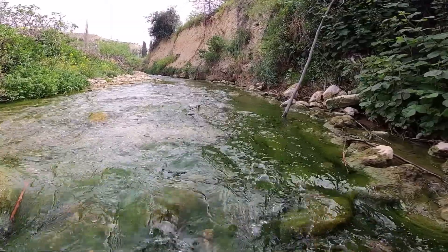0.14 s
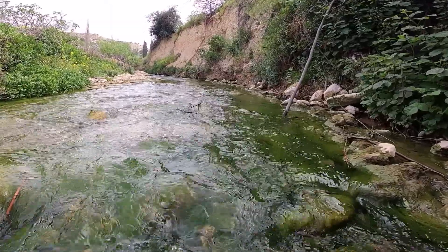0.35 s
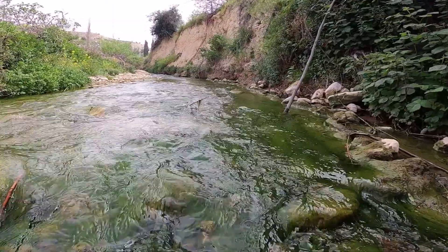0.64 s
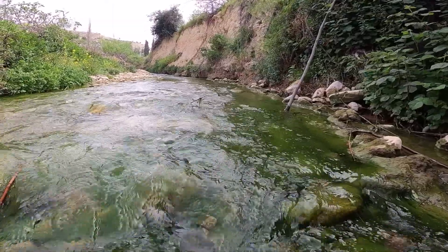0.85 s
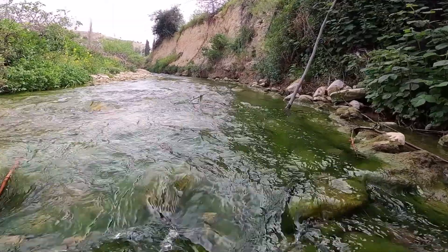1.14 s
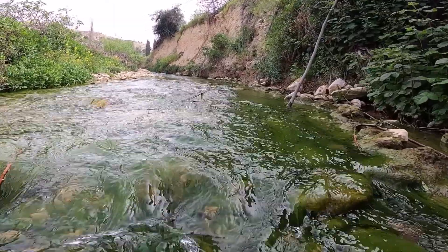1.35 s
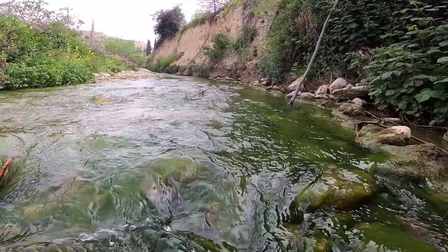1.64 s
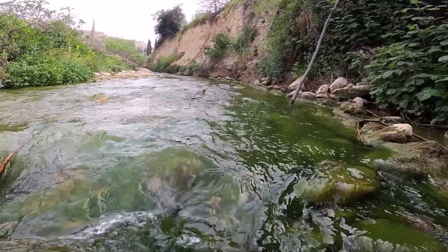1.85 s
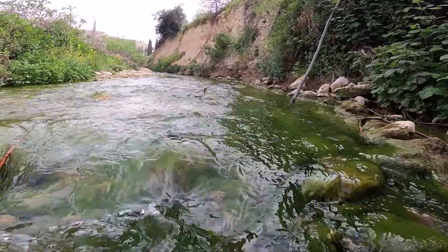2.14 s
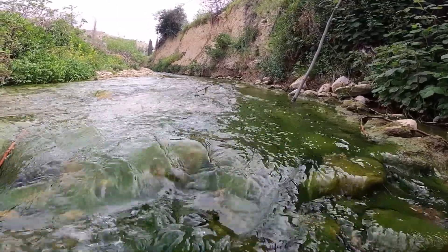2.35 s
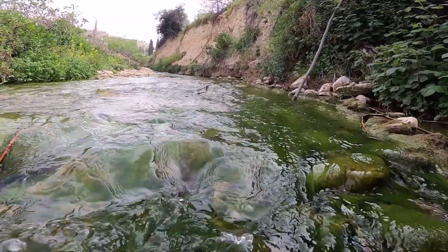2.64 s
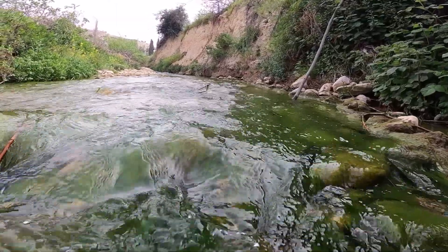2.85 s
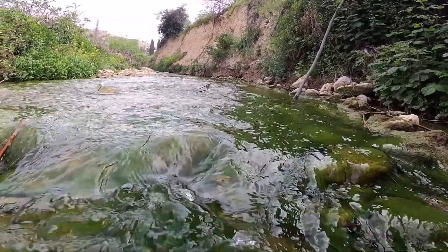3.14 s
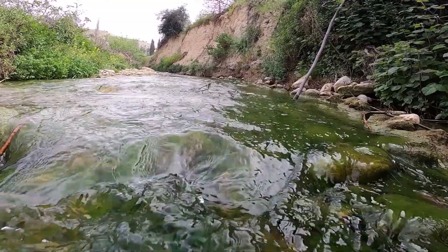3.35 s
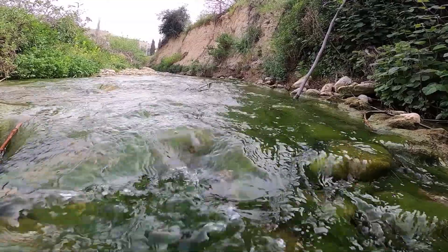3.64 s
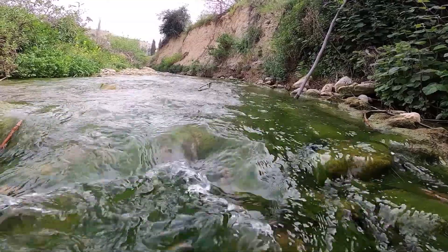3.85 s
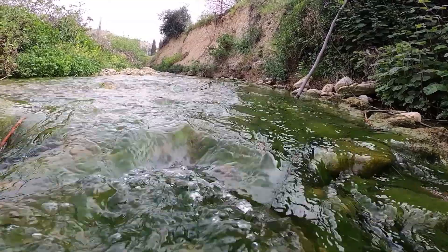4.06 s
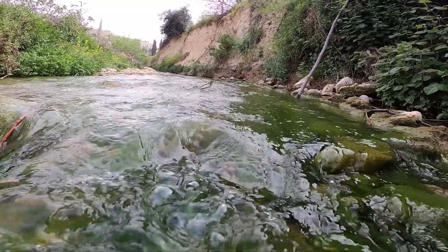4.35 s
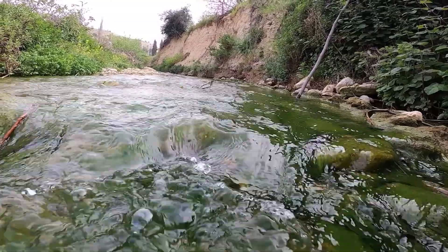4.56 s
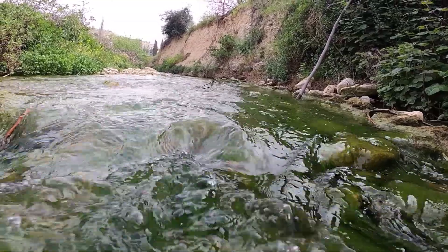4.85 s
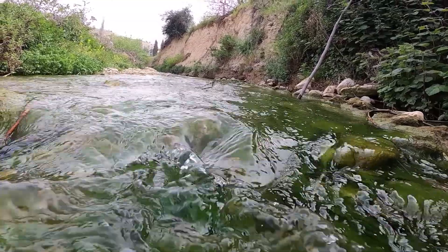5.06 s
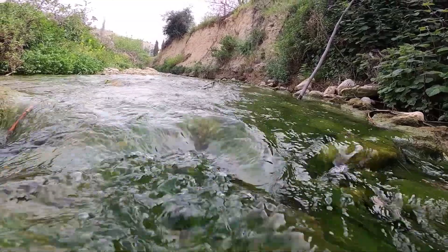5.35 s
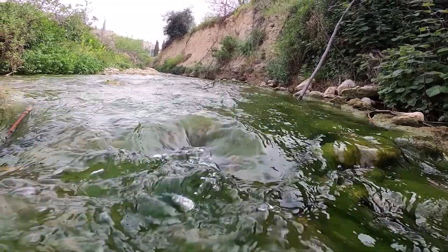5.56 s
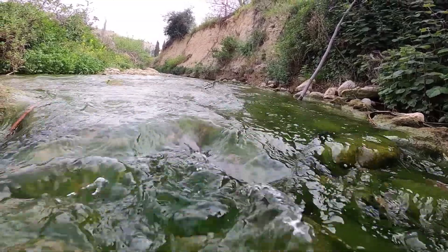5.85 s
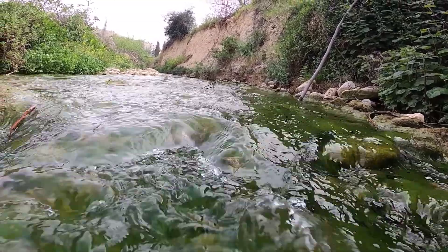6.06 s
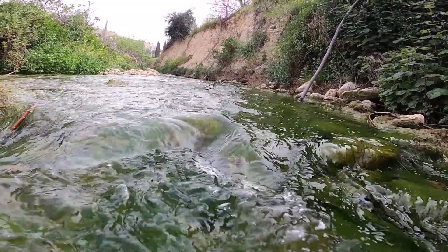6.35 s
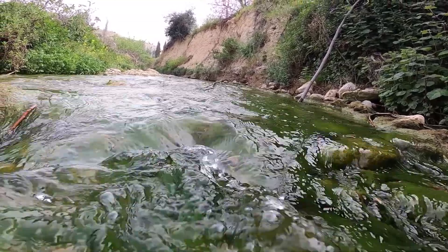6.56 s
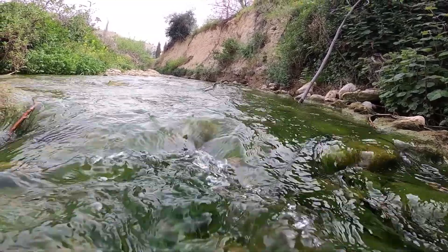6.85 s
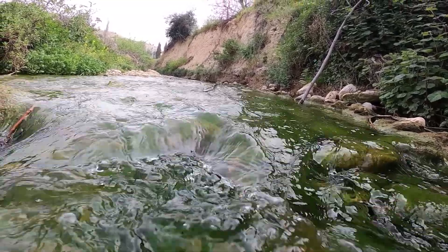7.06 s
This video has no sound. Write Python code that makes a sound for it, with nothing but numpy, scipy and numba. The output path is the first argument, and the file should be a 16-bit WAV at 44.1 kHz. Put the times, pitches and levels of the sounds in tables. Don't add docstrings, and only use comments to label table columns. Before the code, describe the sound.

A shallow stream rushes over stones throughout, gurgling and lightly fizzing, its low rush leaning left. From 0 to 0.85 s a frog, close and slightly right, rattles loudly: about twelve bursts at roughly fourteen per second, each a swelling cluster of dry, bright, ringing clicks around 2.8 kHz. Water and low wind buffets follow. Three throaty croaks come at 1.76-1.98, 2.15-2.52 and 2.82-3.06 s, nasal and squeaky with rough, throbbing rasp. Sharp splash ticks and a small breaking wave with spray occur around 2.6-2.9 s. From 3.1 to 4.5 s the water is livelier, with rounded bubble plops. A second rattle, duller and slightly softer, runs about 4.55-5.27 s in ten bursts. Faint short echoes return from the bank. Afterward the stream calms with more plops; tiny arched bird whistles sound far away at 5.85 and 6.1 s. Bright plops near 6.8 s and a light gust lead out.

```python
import sys
import numpy as np
from scipy import signal
from scipy.fft import rfft, irfft, next_fast_len
from scipy.io import wavfile
from scipy.ndimage import uniform_filter1d
from numba import njit

SR = 44100
rng = np.random.default_rng(int(sys.argv[2]) if len(sys.argv) > 2 else 0)


def bounce(signal):
    frames = np.transpose(np.atleast_2d(signal))
    limited = np.clip(frames, -1, 1)
    pcm = np.round(limited * 32767).astype(np.int16)
    wavfile.write(sys.argv[1], SR, pcm)


def rack_gain(trim_db):
    fader = np.asarray(trim_db, float)
    return 10 ** (fader / 20)


N = 318402

# (time [s], liveliness [dB], left over right [dB])
FLOW = [(0.0, -3, 1.5), (.9, -3, 2.5), (1.6, 1, 2), (2.4, 0, 3), (3.1, 1, 1.5), (3.74, 3, 1.5),
        (4.55, 1.5, 2), (5.3, -2, 2), (5.8, -1.5, 3), (6.5, -3, 4.5), (6.9, -1, 6), (7.22, -3, 5)]
# (frequency [Hz], density [dB per Hz])
RUSH_SPECTRUM = [(53, -47), (90, -11.5), (209, 3), (268, -6), (453, -9.5), (667, -12.5), (965, -9),
                 (1070, -11.5), (1470, -6.5), (1580, -9.5), (1910, -9.5), (4860, -24), (6000, -21.5),
                 (7800, -40.5), (13200, -120)]
# (frequency [Hz], density [dB per Hz])
SPRAY_SPECTRUM = [(1760, -32), (3000, -3.5), (4090, -10.5), (4850, -14.5), (7640, -12.5), (8240, -15),
                  (9130, -17), (10100, -18), (13100, -20), (15500, -39.5)]
# (frequency [Hz], likeness [0-1])
WATER_LIKENESS = [(60, 1), (150, 1), (380, 0.91), (950, 0.85), (2380, 0.67), (5980, 0.42), (15000, 0.085)]
# (frequency [Hz], density [dB per Hz])
WIND_SPECTRUM = [(8.8, -27), (15, -13.5), (33, 3), (54, 1), (177, -19), (228, -26.5), (260, -42),
                 (340, -54.5), (570, -120)]
# (peak time [s], level [dB], time to fall by GUST_FALL_DB [s])
GUSTS = [(0.05, -40, .15), (.58, -44, .3), (1.18, -41, .08), (1.41, -27, .07), (1.79, -39, .1),
         (1.99, -24, .1), (2.22, -30, .06), (2.37, -22, .06), (2.75, -36, .25), (3.05, -33, .1),
         (3.3, -30, .12), (3.5, -36, .15), (4.89, -45, .1), (5.33, -49, .2), (6.54, -49, .15),
         (6.81, -31, .12), (7.22, -40, .06)]
# (last pulse [s], last gap [ms], swell to last pulse [ms], sac [Hz])
RATTLE_1 = [(0.0545, 12.0, 26.8, 2650), (0.1225, 8.7, 25.5, 2730), (0.1952, 7.5, 24.7, 2750),
            (0.2696, 9.6, 26.0, 2780), (0.3429, 10.4, 27.2, 2850), (0.4061, 6.4, 21.0, 2860),
            (0.4864, 11.5, 30.7, 2910), (0.5514, 7.3, 23.9, 2900), (0.6196, 6.1, 20.6, 2900),
            (0.6939, 6.5, 21.1, 2940), (0.7679, 7.4, 24.1, 2910), (0.8516, 12.8, 39.0, 2650)]
# (last pulse [s], last gap [ms], swell to last pulse [ms], sac [Hz])
RATTLE_2 = [(4.6058, 5.2, 17.3, 2260), (4.6716, 8.8, 26.5, 2360), (4.742, 7.8, 24.5, 2440),
            (4.8108, 5.2, 18.2, 2620), (4.8897, 9.4, 24.4, 2620), (4.9644, 8.5, 22.9, 2610),
            (5.0328, 6.3, 18.0, 2640), (5.1109, 8.2, 22.4, 2630), (5.182, 5.9, 18.3, 2580),
            (5.256, 5.5, 18.3, 2350)]
# (peak [dB], sac t60 [s], after-ring [dB], its t60 [s], loss per ms of last gap [dB])
RATTLE_VOICES = [
    (-4, .0075, -13, .03, 1.9),
    (-6, .006, -3, .045, .9),
]
# (frequency [Hz], level [dB], t60 [s], polarity [+1 or -1])
RATTLE_BODY = [
    [(1300, -24, .008, -1), (1700, -28, .008, 1), (2150, -11, .007, -1), (3120, -9, .009, -1),
     (3950, -19, .012, -1), (4330, -21, .012, 1), (4850, -16, .016, 1), (5080, -16, .022, -1)],
    [(560, -28, .012, 1), (1250, -23, .008, -1), (1650, -20, .008, 1), (2150, -12, .008, -1),
     (3050, -15, .008, -1), (3800, -24, .01, 1), (4240, -24, .012, -1), (4930, -26, .016, -1),
     (5180, -21, .025, 1)],
]
# (first swell gap [ms], settled gap [ms], gap before the last [ms], growth [ms per ms of last gap])
RATTLE_PACE = [
    (3.15, 3.55, 4.0, .14),
    (2.9, 3.45, 3.55, .145),
]
# (frequency [Hz], phase [rad])
FROG_PHASE = [(200, 0), (700, -.55), (1550, -.9), (2760, -1.0), (4650, -1.5), (5500, -2.1)]
# (delay [s], level [dB])
ECHOES = [(.0072, -21.5), (0.018, -28.5), (0.033, -25.5), (0.049, -29), (.068, -38), (.095, -48)]
# (time [s], peak [dB], frequency [Hz])
PLOPS = [(1.049, -33, 947), (3.514, -26.5, 1100), (3.621, -28, 970), (3.695, -30, 1430),
         (3.723, -25.5, 2180), (3.936, -28, 945), (4.274, -40, 1410), (4.389, -22, 2050),
         (5.305, -19, 2086), (5.719, -28, 1820), (5.879, -32, 991), (6.049, -29, 789), (6.797, -21.5, 2020),
         (6.851, -21.5, 1386)]
# (time [s], peak [dB], frequency [Hz])
TICKS = [(1.598, -27, 4560), (1.7499, -46, 5130), (2.2225, -21, 3990), (2.613, -33, 3930),
         (2.706, -19, 4250), (2.7142, -22, 4100), (2.8347, -29, 4090), (3.3634, -27, 3870),
         (3.392, -29, 4366), (3.803, -34, 4430), (3.8327, -30, 4020), (6.5096, -56, 4970),
         (7.1886, -30, 4060)]
# (time [s], rate [pulses per s], rasp [0 clear - 1 rough], upper mode [Hz])
RASP = [(1.76, 458, .02, 4800), (1.815, 505, .02, 4800), (1.84, 558, .35, 4800), (1.862, 505, .4, 4800),
        (1.885, 558, .3, 4800), (1.897, 420, .4, 4800), (1.912, 456, .15, 4800), (1.935, 460, .2, 4800),
        (1.94, 315, .45, 4800), (2.14, 271, .05, 4200), (2.225, 285, .2, 3950), (2.24, 312, .4, 4050),
        (2.29, 303, .45, 4350), (2.365, 357, .4, 4120), (2.43, 348, .3, 4120), (2.45, 355, .08, 4900),
        (2.49, 300, .25, 4850), (2.52, 285, .3, 4800), (2.82, 385, .15, 4800), (2.87, 340, .1, 4800),
        (2.95, 330, .25, 4800), (3.01, 338, .25, 4900), (3.035, 366, .08, 4900), (3.06, 345, .15, 4900)]
# (frequency [Hz], width [Hz], level [dB])
THROAT = [(615.6, 73, -4.5), (910, 206, 2.5)]
# (start [s], peak [dB], sac [Hz], throat re sac [dB], upper re sac [dB])
THROBS = [
    [(1.762, -25, 1960, -13, -34), (1.828, -21, 1560, -5, -32), (1.858, -16, 1700, -6, -34),
     (1.892, -8.5, 1820, -19, -36), (1.936, -11, 1980, -19, -33), (1.957, -18, 1950, -13, -33)],
    [(2.145, -19, 1980, -18, -26), (2.246, -18, 1390, -13, -20), (2.294, -14, 1480, -15, -14),
     (2.345, -14, 1490, -12, -12), (2.39, -14, 1480, -12, -14), (2.43, -8.5, 1800, -21, -36),
     (2.472, -14, 1900, -13, -34), (2.498, -20, 1970, -15, -38)],
    [(2.82, -18, 1680, -19, -30), (2.89, -20, 1430, -13, -32), (2.927, -22, 1300, -2, -32),
     (2.968, -13.5, 1480, -12, -40), (3.012, -11, 1800, -16, -29)],
]
# (end [s], dip between throbs [dB], opening swell [s])
CROAK_SHAPE = [
    (1.98, -6, .04),
    (2.518, -8, .05),
    (3.062, -14, .045),
]
# (time [s], pitch [Hz], level [dB])
FAR_BIRD = [
    [(5.835, 2920, -54), (5.855, 3300, -46), (5.88, 2900, -46), (5.9, 2550, -47)],
    [(6.07, 2580, -55), (6.095, 3080, -44), (6.115, 2730, -40), (6.135, 2450, -52)],
]
# (frequency [Hz], level [dB])
MICROPHONE = [(7700, 1), (8200, -5), (9600, -2), (10000, -7)]

RUSH_DB, RUSH_FOLLOWS, SPRAY_DB = -38.5, .3, -54
SURGE_S, SURGE_LENGTH_S, SURGE_EDGE_S, SURGE_DB = 2.66, .19, .05, 11
GUST_FALL_DB, CALM_DB = 12, -55
SETTLE_S = .1
THROB_PEAK_AT, THROB_ROUND = .58, 1.3
CLOSE_S, SAC_GLIDE_S = .012, .008
GAIN_KNEE_DB, GAIN_SLOPE, GAIN_RELEASE_DB_PER_S = -30, .2, 30


def rms_one(x):
    return x / np.sqrt(np.mean(x ** 2) + 1e-20)


def evened(x, span_s):
    return x / np.sqrt(uniform_filter1d(x ** 2, size=int(span_s * SR)) + 1e-12)


def in_time(rows):
    s, *columns = np.transpose(rows)
    return [np.interp(np.arange(N) / SR, s, c) for c in columns]


def at_hz(points, hz):
    curve_hz, value = np.transpose(points)
    return np.interp(np.log(hz), np.log(curve_hz), value)


def drift(rate):
    r = np.exp(-80 * np.pi * rate / SR)
    slow = signal.lfilter([1], [1, -2 * r, r * r], rng.standard_normal(N // 40 + 2002))[2000:]
    return np.interp(np.arange(N) / 40, np.arange(len(slow)), rms_one(slow))


def ring(clicks, hz, t60):
    r, w = rack_gain(-60 / (t60 * SR)), 2 * np.pi * hz / SR
    return signal.lfilter([0, np.sin(w)], [1, -2 * r * np.cos(w), r * r], clicks + 1e-18)


@njit
def resonate(x, hz, r, rate):
    y = np.zeros(len(x))
    for i in range(2, len(x)):
        fed_back = 2 * r[i] * np.cos(2 * np.pi * hz[i] / rate) * y[i - 1] - r[i] ** 2 * y[i - 2]
        y[i] = x[i] - x[i - 2] + fed_back
    return y


def steep_band(x, low_hz, high_hz, order):
    return signal.sosfilt(signal.butter(order, [low_hz, high_hz], "band", fs=SR, output="sos"), x)


def by_frequency(x, response):
    size = next_fast_len(N)
    hz = np.arange(1, size // 2 + 2) * SR / size
    return irfft(rfft(x, size) * response(hz), size)[..., :N]


def banded_noise(spectrum, shared_db, own_db, speed, likeness):
    low_hz, high_hz = spectrum[0][0], spectrum[-1][0]
    edges = np.geomspace(low_hz, high_hz, round(2.5 * np.log2(high_hz / low_hz)) + 1)
    out, together, white = 0, drift(speed), rng.standard_normal((2, 2, N))
    for k, (low, high) in enumerate(zip(edges, edges[1:])):
        mid, side = steep_band(white[k % 2], low, high, order=2)
        hz = np.sqrt(low * high)
        alike = at_hz(likeness, hz)
        gain = rack_gain(at_hz(spectrum, hz) + shared_db * together + own_db * drift(2 * speed))
        out = out + gain * (np.sqrt(1 + alike) * mid + np.sqrt(1 - alike) * side * [[1], [-1]])
    return rms_one(out)


def bubbles(per_s, low_hz, high_hz, cycles, spread_db, soft):
    born = rng.random(N) < per_s * rack_gain(3 * drift(5)) / SR
    sizes = rack_gain(spread_db * np.minimum(rng.exponential(1, N), 3.5)) * born
    sizes = signal.lfilter([1, 2, 1], [1, -soft], sizes)
    dealt, sides = rng.integers(0, 16, N), rng.normal(0, 1.2, 16)
    out = 0
    for k, hz in enumerate(np.geomspace(low_hz, high_hz, 16)):
        out = out + ring(sizes * (dealt == k), hz, cycles / hz) * rack_gain(sides[k] * np.array([[1], [-1]]))
    return rms_one(out)


def stream():
    lively_db, pan_db = in_time(FLOW)
    since = np.arange(N) / SR - SURGE_S
    lively_db += SURGE_DB * np.clip(np.minimum(since, SURGE_LENGTH_S - since) / SURGE_EDGE_S + 1, 0, 1)
    rush_db = RUSH_DB + RUSH_FOLLOWS * np.minimum(lively_db, 4)
    spray_db = SPRAY_DB + lively_db
    rush = rack_gain(rush_db + 1.5) * banded_noise(RUSH_SPECTRUM, 1.4, 1.5, speed=6, likeness=WATER_LIKENESS)
    gurgle = rack_gain(rush_db - 5) * bubbles(160, 300, 3200, cycles=22, spread_db=4.5, soft=.6)
    spray = rack_gain(spray_db + 3) * banded_noise(SPRAY_SPECTRUM, 1.5, 1.8, speed=9, likeness=WATER_LIKENESS)
    fizz = rack_gain(spray_db - 8.5) * bubbles(230, 2300, 12000, cycles=10, spread_db=5.0, soft=.1)
    return (rush + gurgle) * rack_gain(pan_db * np.array([[.5], [-.5]])) + spray + fizz


def wind():
    t = np.arange(N) / SR
    power = rack_gain(2 * CALM_DB)
    for s, db, fall_s in GUSTS:
        power = power + rack_gain(2 * (db - GUST_FALL_DB * np.abs(t - s) / fall_s))
    rumble = banded_noise(WIND_SPECTRUM, 2.5, -1.0, speed=14, likeness=[(20, -0.079), (260, 0.23)])
    return rack_gain(9.5) * np.sqrt(power) * rumble


def rattle(notes, body, pace, peak_db, t60, after_db, after_t60, fade_db):
    first_gap, settled_gap, end_gap, end_growth = pace
    clicks, sac, t = np.zeros(N), np.zeros(N), np.arange(400) / SR
    held = np.clip((.0078 - t) / .002, 0, 1) * np.minimum(t / .0003, 1)
    decay = (rack_gain(-60 * t / t60) + rack_gain(after_db - 60 * t / after_t60)) * held
    for last_s, last_gap, swell_ms, hz in notes:
        swell_gap = settled_gap + (first_gap - settled_gap) * np.exp((notes[0][0] - last_s) / SETTLE_S)
        gap = end_gap + end_growth * last_gap
        gaps = swell_gap + (gap - swell_gap) * .55 ** np.arange(11)
        before = np.cumsum(np.r_[0, last_gap, gaps])
        level_db = peak_db - 6.5 * np.logaddexp(0, (before - swell_ms + 2.5) / 3.4)
        level_db[0] -= min(fade_db * max(last_gap - 5.5, 0), 10)
        at = np.round((last_s - before / 1000) * SR).astype(int)
        note = np.zeros(4096)
        note[at - at[-1]] = rack_gain(level_db + rng.normal(0, .7, len(at)))
        pulse = decay * np.sin(2 * np.pi * hz * t)
        start, end = max(at[-1], 0), at[-1] + 4096
        clicks[start:end] += note[start - at[-1]:]
        latest = np.maximum.accumulate(np.arange(4096) * (note > 0))
        since = np.minimum(np.arange(4096) - latest, 399)
        sac[start:end] += (note[latest] * pulse[since])[start - at[-1]:]
    modes = sum(np.sign(sign) * rack_gain(db) * ring(clicks, hz, mode_t60) for hz, db, mode_t60, sign in body)
    soft = signal.cheby2(8, 40, 6000, fs=SR, output="sos")
    return steep_band(signal.sosfilt(soft, sac + modes), 500, 8000, order=2)


def drops(events, cycles):
    out = np.zeros(N + 2048)
    for s, db, hz in events:
        turns = np.arange(2048) / SR * hz
        level = rack_gain(db - 60 * turns / cycles) * np.minimum(turns, 1)
        out[round(s * SR):][:2048] += level * np.sin(2 * np.pi * turns * (1 + 0.0018 * turns))
    return out[:N]


def throbbing():
    t, effort, steps = np.arange(N) / SR, np.zeros(N), np.zeros((3, N))
    for throbs, (end_s, dip_db, swell_s) in zip(THROBS, CROAK_SHAPE):
        start, peak_db, *colour = np.transpose(throbs)
        edges = np.r_[start, end_s]
        phase = np.interp(t, edges, np.arange(len(edges))) % 1
        turn = phase ** (np.log(.5) / np.log(THROB_PEAK_AT))
        lump = rack_gain(dip_db) + (1 - rack_gain(dip_db)) * np.sin(np.pi * turn) ** THROB_ROUND
        sounding = np.clip((t - start[0]) / swell_s, 0, 1) * np.clip((end_s - t) / CLOSE_S, 0, 1)
        effort += sounding * lump * rack_gain(np.interp(t, start + THROB_PEAK_AT * np.diff(edges), peak_db))
        now = t > start[0] - .1
        steps[:, now] = np.array(colour)[:, np.maximum(np.searchsorted(start, t[now]) - 1, 0)]
    return effort, *uniform_filter1d(steps, size=int(SAC_GLIDE_S * SR))


def croaks():
    effort, sac_hz, throat_db, upper_db = throbbing()
    per_s, rasp, upper_hz = in_time(RASP)
    turns = np.cumsum(per_s * (1 + .24 * rasp * drift(90)) / SR)
    pulses = np.diff(np.floor(turns), prepend=0) * rack_gain(6 * rasp * rng.standard_normal(N))
    breath = .24 * rasp * rng.standard_normal(N) * np.exp(-3 * (turns % 1))
    source = pulses + breath

    def damping(width_hz):
        return np.exp(-np.pi * width_hz / SR) + 0 * rasp

    sac = resonate(source, sac_hz, damping(140 + 180 * rasp), SR)
    mouth = ring(source, 2000, .012)
    sac = evened(sac, .012) + rack_gain(-11) * evened(mouth, .012)
    upper = resonate(source, upper_hz, damping(150), SR)
    upper = resonate(upper, upper_hz, damping(600), SR)
    throat = sum(rack_gain(db) * ring(source, hz, np.log(1000) / (np.pi * width)) for hz, width, db in THROAT)
    rasping = evened(steep_band(source, 2500, 3700, order=2), .012)
    voice = evened(steep_band(sac, 900, 2300, order=4), .012)
    voice += rack_gain(throat_db) * evened(steep_band(throat, 430, 1250, order=3), .012)
    voice += rack_gain(upper_db) * (evened(upper, .012) + rack_gain(-8) * rasping)
    return rack_gain(3) * effort * voice


def frog():
    first = rattle(RATTLE_1, RATTLE_BODY[0], RATTLE_PACE[0], *RATTLE_VOICES[0])
    second = rattle(RATTLE_2, RATTLE_BODY[1], RATTLE_PACE[1], *RATTLE_VOICES[1])
    call = rack_gain(4) * steep_band(first, 1060, 9000, order=1) + rack_gain(3.2) * second + croaks()
    left = by_frequency(call, lambda hz: np.exp(1j * at_hz(FROG_PHASE, hz)))
    placed = np.array([left * rack_gain(-.7), call * rack_gain(.7)])
    for s, db in ECHOES:
        lag = round(s * SR)
        placed[:, lag:] += rack_gain(db + rng.normal(0, 2, (2, 1))) * call[:-lag]
    return placed


def far_bird():
    out, t = 0, np.arange(N) / SR
    for call in FAR_BIRD:
        hz, level_db = in_time(call)
        sounding = uniform_filter1d(1. * (t > call[0][0]) * (t < call[-1][0]), size=200)
        turns = np.cumsum(uniform_filter1d(hz, size=400)) / SR
        out = out + rack_gain(level_db) * sounding * np.sin(2 * np.pi * turns)
    return out


def gain_control(x):
    level_db = 10 * np.log10(uniform_filter1d(np.mean(x ** 2, axis=0), size=1024) + 1e-12)
    ramp = GAIN_RELEASE_DB_PER_S * np.arange(N) / SR
    wanted_db = GAIN_SLOPE * np.maximum(level_db - GAIN_KNEE_DB, 0)
    cut_db = np.maximum.accumulate(wanted_db + ramp) - ramp
    return x * rack_gain(-uniform_filter1d(cut_db, size=1024))


def scene():
    splashes = drops(TICKS, cycles=30.5) + drops(PLOPS, cycles=34)
    return stream() + wind() + frog() + splashes + far_bird()


def roll_off(x):
    return signal.sosfilt(signal.butter(12, 15680, fs=SR, output="sos"), x)


def record(dry):
    heard = by_frequency(gain_control(dry), lambda hz: rack_gain(at_hz(MICROPHONE, hz)))
    rounded = heard / (1 + np.abs(heard / .95) ** 6) ** (1 / 6)
    mix = signal.sosfilt(signal.cheby2(10, 60, 16300, fs=SR, output="sos"), rounded)
    return roll_off(mix)


dry = scene()
out = record(dry)
bounce(out)
```